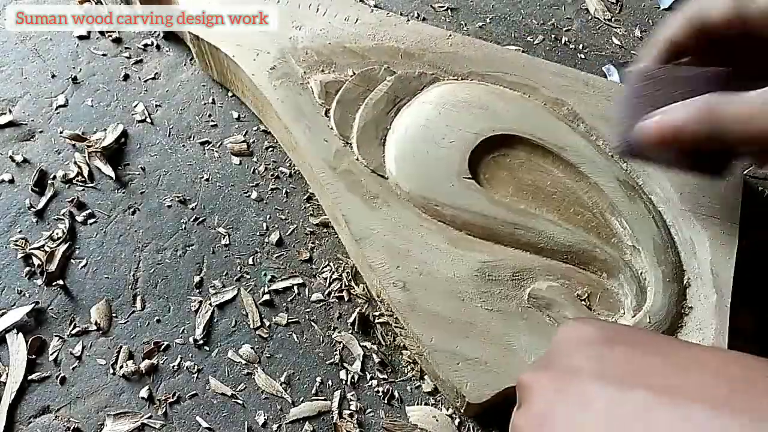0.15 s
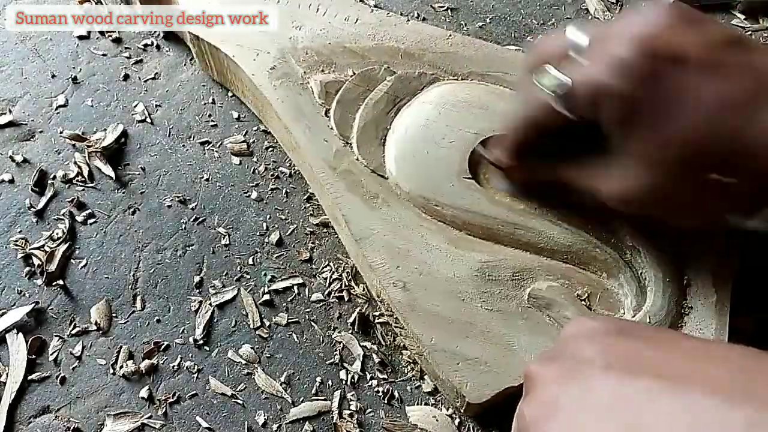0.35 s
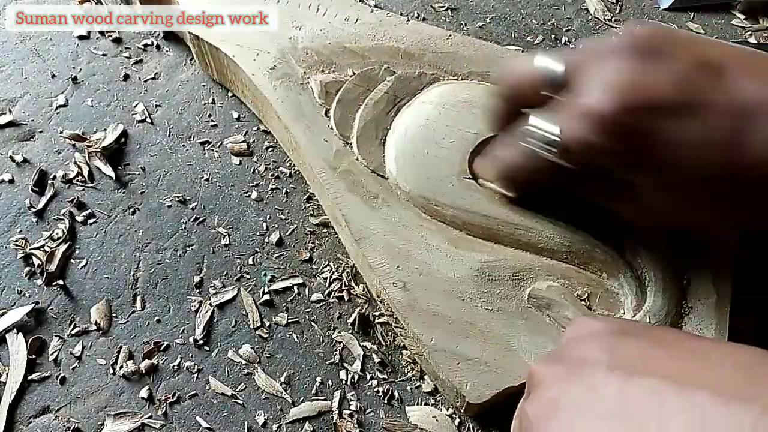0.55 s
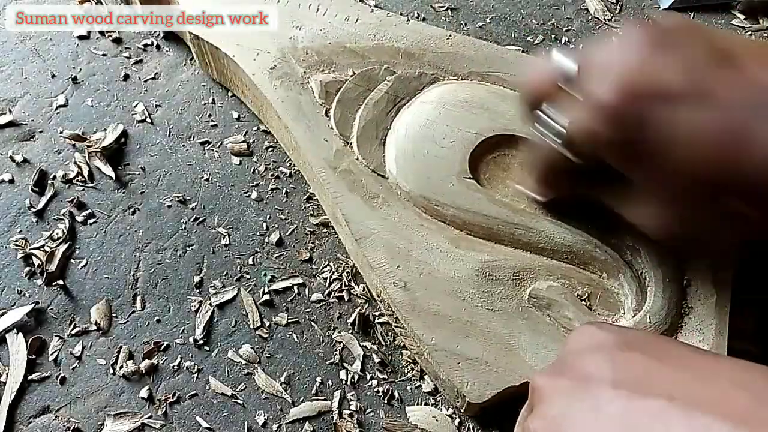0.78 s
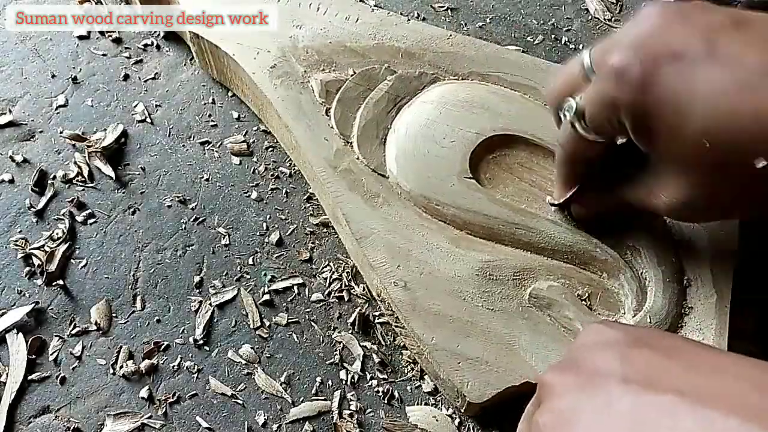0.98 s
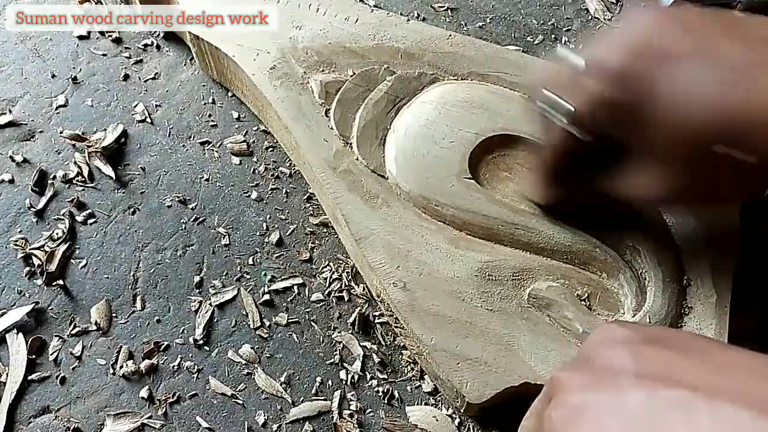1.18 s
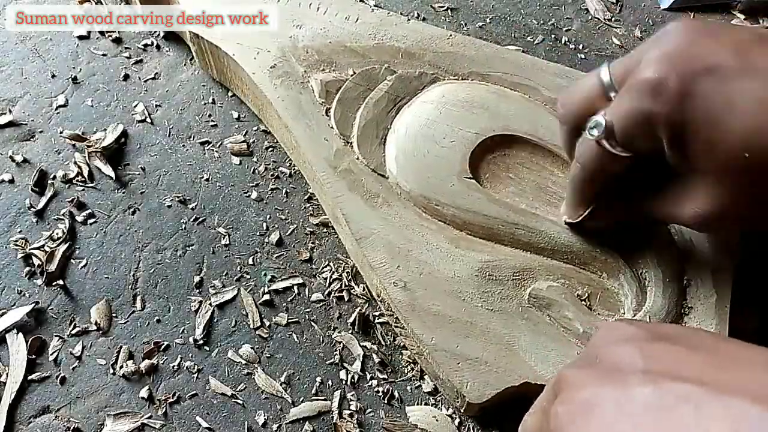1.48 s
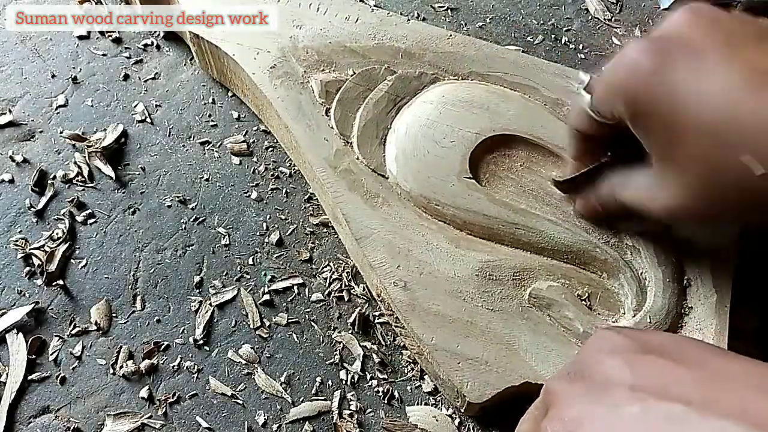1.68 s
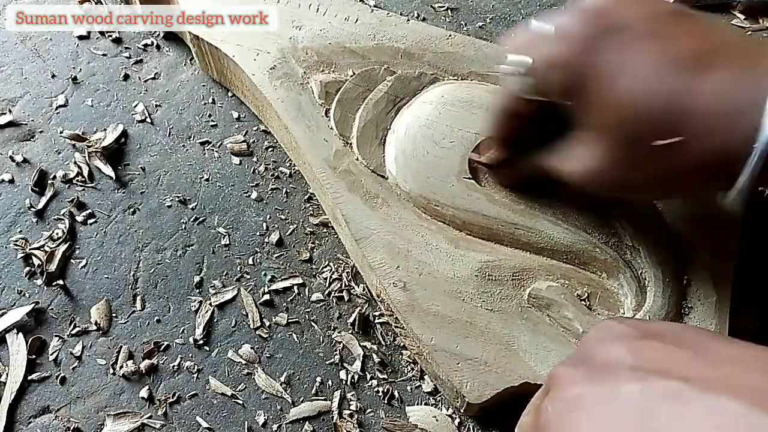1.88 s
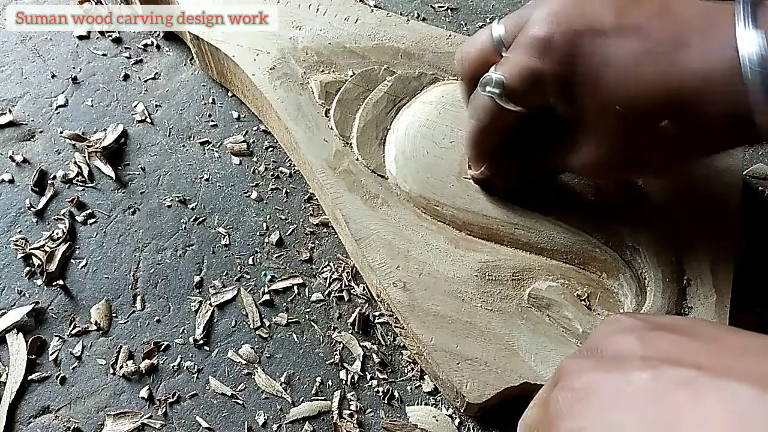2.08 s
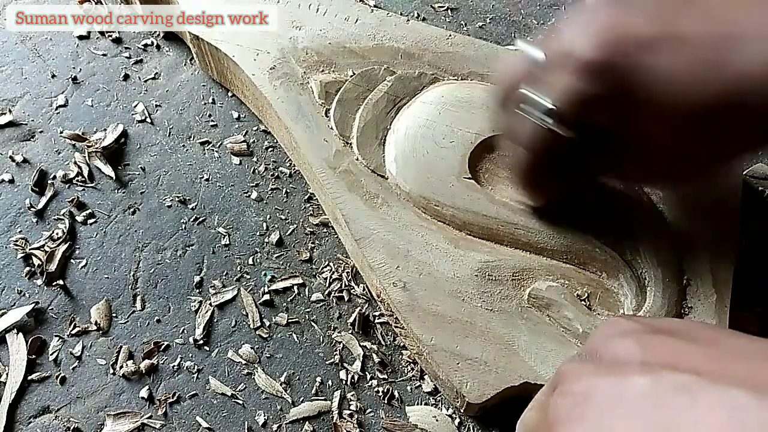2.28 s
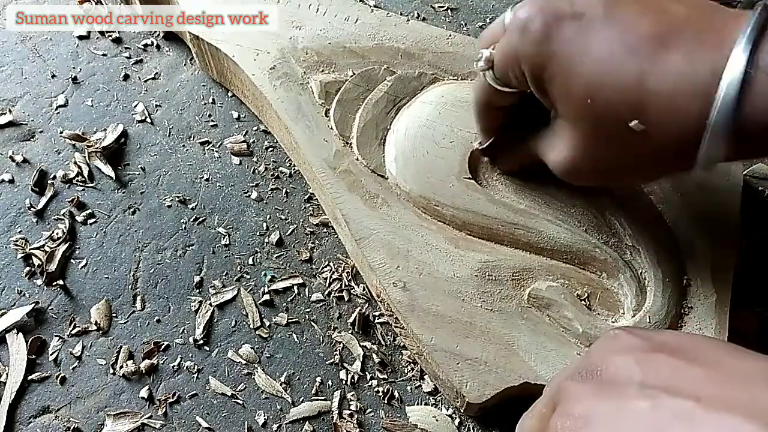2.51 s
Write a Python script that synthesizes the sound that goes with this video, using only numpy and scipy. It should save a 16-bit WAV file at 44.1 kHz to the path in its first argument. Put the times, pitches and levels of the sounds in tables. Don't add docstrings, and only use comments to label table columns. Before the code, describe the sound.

Sandpaper rasps on a carved wooden board: faint touches first, then rapid even to-and-fro strokes with paper snaps and light knocks, a short skid, and last strokes. Close stereo in a softly rumbling workshop.

```python
import sys
import numpy as np
from scipy import signal
from scipy.fft import rfft, irfft
from scipy.io import wavfile
from scipy.ndimage import uniform_filter1d

SR = 44100
rng = np.random.default_rng(int(sys.argv[2]) if len(sys.argv) > 2 else 0)


def natural_amplitude(level_db):
    exponent = np.asarray(level_db, float) / 20
    return 10 ** exponent


def master_out(mix):
    frames = np.transpose(np.atleast_2d(mix))
    ceiling = np.clip(frames, -1, 1)
    pcm = np.round(ceiling * 32767).astype(np.int16)
    wavfile.write(sys.argv[1], SR, pcm)


N = 116865


def rms_one(x):
    return x / np.sqrt(np.mean(x ** 2) + 1e-20)


def at_hz(points, hz):
    table_hz, value = np.transpose(points)
    return np.interp(np.log(hz + 1), np.log(table_hz), value)


def drift(rate_hz):
    r = np.exp(-40 * np.pi * rate_hz / SR)
    noise = rng.standard_normal(N // 20 + 2002)
    slow = signal.lfilter([1], [1, -2 * r, r * r], noise)[2000:]
    return np.interp(np.arange(N) / 20, np.arange(len(slow)), rms_one(slow))


def spread(three, alike, colour_db, lag_s, peaks=()):
    hz = np.fft.rfftfreq(three.shape[1], 1 / SR)
    like = np.clip(at_hz(alike, hz), 0, 1)
    both, left, right = rfft(three)
    left = np.sqrt(like) * both + np.sqrt(1 - like) * left
    right = np.sqrt(like) * both + np.sqrt(1 - like) * right
    left = left * np.exp(-2j * np.pi * hz * lag_s)
    ring_db = sum(db / (1 + (2 * (hz - top_hz) / width) ** 2) for top_hz, width, db in peaks)
    return np.array([left, right]) * natural_amplitude([at_hz(colour, hz) + ring_db for colour in colour_db])


def by_band(spectra, gain_db):
    hz = np.fft.rfftfreq(N, 1 / SR)
    place = np.clip(6 * np.log2((hz + 1) / 600), 0, 27)
    out = 0
    for k in range(28):
        band = irfft(spectra * np.clip(1 - abs(place - k), 0, 1), N)
        out = out + band * natural_amplitude(gain_db(600 * 2 ** (k / 6)))
    return out


# (frequency [Hz], level [dB per Hz])
AIR_COLOUR = [(18, -6), (33, 1), (75, -7), (160, -3), (330, -16), (1500, -23), (2900, -34), (9000, -36)]
# (frequency [Hz], likeness [0-1])
AIR_ALIKE = [(30, 0.94), (150, 0.96), (400, 0.9), (1000, 0.79)]


def air():
    level_db, wander_db = -57.5, 1.63
    sound = irfft(spread(rng.standard_normal((3, N)), AIR_ALIKE, (AIR_COLOUR, AIR_COLOUR), 0), N)
    return natural_amplitude(level_db + wander_db * drift(2.1)) * rms_one(sound)


def grit(speed):
    clicks_per_s, size_spread_db, hiss_share = 7900, 3.5, 0.83
    chance = np.clip(clicks_per_s * (0.34 + speed) / SR, 1e-3, 1)
    size_db = size_spread_db * np.minimum(rng.exponential(1, (3, N)), 3.5)
    sizes = rms_one(natural_amplitude(size_db)) * rng.choice([-1, 1], (3, N))
    clicks = sizes * (rng.random((3, N)) < chance) / np.sqrt(chance)
    hiss = rng.standard_normal((3, N))
    return np.sqrt(1 - hiss_share) * clicks + np.sqrt(hiss_share) * hiss


# (start [s], length [s], level [dB], share of the stroke before top speed [0-1], wood against paper [dB])
TOUCHES = [
    (.002, 0.045, -54.5, 0.084, 1),
    (.025, 0.09, -53.5, 0.094, 2.5),
    (.07, 0.41, -60.5, 0.1, 3.5),
    (.196, 0.02, -51, 0.53, 10.5),
    (.16, 0.029, -71, .5, -8),
    (.272, 0.026, -42.5, 0.17, -2.5),
    (.344, 0.028, -41, .2, -3),
    (2.345, 0.096, -48, 0.047, -1.5),
]
# (start [s], length [s], level [dB], share of the stroke before top speed [0-1], wood against paper [dB])
PUSHES = [(0.238, 0.03, -40, 0.84, 0), (0.356, 0.032, -36, 0.79, -9), (0.464, 0.07, -40.5, 0.32, -3.5),
          (0.585, 0.064, -39, 0.37, -5.5), (0.709, 0.048, -40, 0.27, -4.5), (0.824, 0.059, -41.5, 0.58, -3),
          (0.945, 0.07, -38, 0.15, -10), (1.060, 0.055, -39, 0.27, -7), (1.17, 0.066, -41, 0.51, -5.5),
          (1.29, 0.061, -38.5, 0.41, -7.5), (1.41, 0.056, -40, 0.4, -6.5), (1.532, 0.056, -38.5, 0.5, -8.5),
          (1.661, 0.038, -38.5, 0.52, -3.5), (1.776, 0.032, -38.5, 0.72, -7.5),
          (1.882, 0.041, -39.5, 0.67, -5.5), (1.988, 0.064, -41.5, 0.25, -1),
          (2.107, 0.064, -43, 0.33, -6.5), (2.221, 0.083, -40, 0.1, -5), (2.483, 0.046, -40, 0.73, 0),
          (2.593, 0.052, -42, 0.68, -1)]
# (start [s], length [s], level [dB], share of the stroke before top speed [0-1], wood against paper [dB])
PULLS = [(0.292, 0.058, -38, 0.46, -2), (0.4, 0.061, -38.5, 0.58, -2.5), (0.524, 0.056, -40, 0.6, -2.5),
         (0.644, 0.056, -41.5, 0.6, 1.5), (0.76, 0.062, -39.5, 0.33, 0), (0.879, 0.052, -38.5, 0.65, -3),
         (0.998, 0.057, -38.5, 0.28, -2.5), (1.106, 0.057, -39, 0.68, -2), (1.23, 0.069, -39, 0.36, -3.5),
         (1.35, 0.062, -40, 0.42, -1.5), (1.471, 0.07, -39, 0.33, -2), (1.596, 0.05, -37, 0.7, -2),
         (1.703, 0.061, -40.5, 0.47, -3), (1.82, 0.063, -40.5, 0.41, -0.5), (1.935, 0.063, -42, 0.35, 0),
         (2.044, 0.063, -43.5, 0.47, 0.5), (2.156, 0.065, -40.5, 0.54, -2),
         (2.403, 0.077, -47.5, 0.67, -0.5), (2.54, 0.045, -42, 0.59, -2)]


def strokes():
    speed_power, creep_db, overlap_s, rub_db = 1.536, -27, 0.0028, -6.5
    t = np.arange(N) / SR
    speed, power, wood = np.zeros(N), np.zeros(N), np.full(N, 1e-12)
    for rows, creep in (([*PUSHES, *PULLS], natural_amplitude(creep_db)), (TOUCHES, 0)):
        for start, length, db, rise, wood_db in rows:
            u = (t - start + overlap_s) / (length + 2 * overlap_s)
            rise = np.clip(rise, .1, .9)
            bend = np.clip(np.where(u < rise, u / rise, (1 - u) / (1 - rise)), 0, 1)
            shape = np.sin(np.pi / 2 * bend) ** speed_power
            part = (natural_amplitude(db + rub_db) * (shape + creep * (abs(u - .5) < .5))) ** 2
            speed = np.maximum(speed, shape)
            power = power + part
            wood = wood + part * wood_db
    return speed, np.sqrt(power), wood / (power + 1e-12)


# (frequency [Hz], level [dB per Hz])
RASP_LEFT = [(500, -29), (850, -12), (1350, -17.5), (1900, -3.5), (2900, -1), (7300, -3.5), (8900, 1),
             (14500, -8.5)]
# (frequency [Hz], level [dB per Hz])
RASP_RIGHT = [(850, -14), (1350, -16), (1900, -3), (2900, -1), (6500, -1), (7800, 5), (9200, 1),
              (13000, -7.5)]
# (frequency [Hz], likeness [0-1])
RASP_ALIKE = [(500, .8), (1500, .45), (2450, .3), (2750, .86), (3100, .55), (4700, .45), (6600, .35),
              (11000, .12)]
# (frequency [Hz], width [Hz], level [dB])
RINGS = [(770, 340, 9.5), (1863, 160, 4.5), (3204, 17, 6), (4230, 27, 2), (4700, 33, -6.5),
         (5200, 20, -1.5), (5460, 17, -4.5), (6270, 26, -1), (8440, 1100, 5)]
LEFT_LAG_S = .0002


def rubbing():
    patchy_db, shared_patchy_db, patch_rate_hz = 4.5, 1, 21.4
    patchy_below_hz, wood_below_hz = 7000, 3530
    speed, loud, wood_db = strokes()
    colours = (RASP_LEFT, RASP_RIGHT)
    plain = irfft(spread(rng.standard_normal((3, N)), RASP_ALIKE, colours, LEFT_LAG_S), N)
    unit = np.std(plain.mean(axis=0))
    together = shared_patchy_db * drift(2 * patch_rate_hz)

    def band_db(hz):
        patches = patchy_db * drift(patch_rate_hz) / (1 + (hz / patchy_below_hz) ** 2)
        return together + patches + wood_db / (1 + (hz / wood_below_hz) ** 6)

    rasp = spread(loud * grit(speed), RASP_ALIKE, colours, LEFT_LAG_S, RINGS)
    return by_band(rasp, band_db) / unit


def room(x):
    level_db, t60_s = -11.5, 0.1
    t = np.arange(SR // 2) / SR
    tail = rng.standard_normal((2, len(t))) * natural_amplitude(-60 * t / t60_s) * (t > .004)
    tail = tail / np.sqrt(np.sum(tail ** 2) / 2)
    return natural_amplitude(level_db) * signal.fftconvolve(x, tail, axes=1)[:, :N]


# (time [s], peak level [dB], amount of dull knock)
SNAPS = [(.0105, -46, .1), (.1936, -36, 1.5), (.1950, -40, 2), (.2262, -41, 0), (.2478, -40, .3),
         (.2602, -33, .3), (.3462, -35, .1), (.3732, -28, .2), (.4168, -40, .2), (.6035, -39, .2),
         (.7198, -39, .2), (.7722, -38, .3), (.8912, -36, .2), (.9492, -32, .3), (.9508, -32, .3),
         (.9853, -35, .1), (1.0076, -24, .1), (1.0088, -31, .1), (1.0694, -37, .2), (1.1832, -40, .2),
         (1.2462, -35, .1), (1.2533, -26, .2), (1.2552, -31, .1), (1.2650, -33, .1), (1.3025, -35, .1),
         (1.3632, -36, .3), (1.3762, -30, .1), (1.4910, -32, .3), (1.4216, -37, .1), (1.4802, -34, .3),
         (1.6062, -37, .2), (1.6285, -30, .4), (1.6738, -37, .2), (1.7180, -37, .4), (1.7868, -37, .1),
         (1.7955, -33, .1), (1.8025, -35, .1), (1.8367, -37, .4), (1.9496, -37, .3), (1.9565, -36, .5),
         (2.0676, -39, .3), (2.1185, -40, .2), (2.1704, -36, .3), (2.1830, -34, .3), (2.5070, -35, .2),
         (2.5535, -39, .2), (2.6050, -40, .3)]


def snaps():
    level_db, burst_s, lead = 1, .00032, 256
    out = np.zeros((2, N + SR))
    t = np.clip(np.arange(-lead, 768) / SR, 0, 1)
    noise = rng.standard_normal((len(SNAPS), 3, 1024))
    bursts = noise * np.sqrt(t / burst_s) * np.exp(-t / burst_s)
    for (s, db, knock), burst in zip(SNAPS, bursts):
        burst = (1 + knock) * burst - np.roll(burst, 2, axis=1)
        pair = irfft(spread(burst, RASP_ALIKE, (RASP_LEFT, RASP_RIGHT), LEFT_LAG_S, RINGS))
        first = int(s * SR) - lead
        out[:, first:first + 1024] += natural_amplitude(db + level_db) * pair / abs(pair.mean(axis=0)).max()
    return out[:, :N]


# (frequency [Hz], level [dB], time to fade by 60 dB [s])
BOARD = [(875, -6.5, 0.033), (1547, -14, 0.023), (1882, -4.5, 0.046), (2610, -4, 0.017)]
# (time [s], board tone [0-3], level [dB])
DRAGS = [
    (.021, 0, -56),
    (.028, 0, -55),
    (.034, 2, -57),
    (.040, 2, -57),
    (.052, 2, -59),
    (.062, 2, -62),
]


def board():
    knock_db = -16.5
    strengths_db = rng.normal(0, 4.4, (len(SNAPS), len(BOARD)))
    s, db, knock = np.transpose(SNAPS)
    out = 0
    for k, (hz, mode_db, t60_s) in enumerate(BOARD):
        clicks = np.zeros(N)
        clicks[(s * SR).astype(int) + 20] = knock * natural_amplitude(db + knock_db + mode_db + strengths_db[:, k])
        for at, mode, drag_db in DRAGS:
            clicks[int(at * SR)] += natural_amplitude(drag_db) * (mode == k)
        r, w = natural_amplitude(-60 / (t60_s * SR)), 2 * np.pi * hz / SR
        out = out + signal.lfilter([0, np.sin(w)], [1, -2 * r * np.cos(w), r * r], clicks + 1e-18)
    return out


# (start [s], length [s], first pitch [Hz], last pitch [Hz], breadth [Hz], level [dB])
CHIRPS = [
    (.050, .062, 4150, 5100, 110, -70),
    (2.164, .062, 5800, 5050, 480, -48.5),
]


def birds():
    level_db = 5
    out, t = np.zeros((2, N)), np.arange(N) / SR
    for start, length, first_hz, last_hz, breadth_hz, db in CHIRPS:
        u = np.clip((t - start) / length, 0, 1)
        turn = 2 * np.pi * np.cumsum(first_hz + (last_hz - first_hz) * u) / SR
        swell = natural_amplitude(db + level_db) * np.sqrt(abs(np.sin(np.pi * u)))
        for side in out:
            side += swell * (drift(breadth_hz) * np.cos(turn) + drift(breadth_hz) * np.sin(turn))
    return out * natural_amplitude([[-2], [2]])


# (time [s], level [dB])
SKID = [
    (2.262, -56),
    (2.29, -47),
    (2.301, -41),
    (2.313, -40),
    (2.319, -46),
    (2.328, -38),
    (2.336, -46),
    (2.345, -54),
    (2.36, -60),
]
# (frequency [Hz], width [Hz], level [dB])
HOLLOW = [(1144, 54, 2.5), (1460, 170, -2), (2380, 170, -0.5), (3036, 160, 3.5), (4780, 740, 4),
          (6000, 530, 3.5), (7840, 1250, 1)]


def skid():
    level_db, rough_db = 2.5, 1
    s, db = np.transpose(SKID)
    path_db = np.interp(np.arange(N) / SR, s, db, left=-99, right=-99)
    loud = natural_amplitude(path_db + level_db + rough_db * drift(79))
    rough, out = grit(np.full(N, .3))[1:], 0
    for k, (hz, width, top_db) in enumerate(HOLLOW):
        r = np.exp(-np.pi * width / SR)
        poles = [1, -2 * r * np.cos(2 * np.pi * hz / SR), r * r]
        out = out + (-1) ** k * natural_amplitude(top_db) * signal.lfilter([1 - r * r, 0, r * r - 1], poles, rough)
    return uniform_filter1d(loud, size=90) * rms_one(out) * natural_amplitude([[1], [2]])


def scene():
    work = rubbing() + snaps() + skid() + board()
    return work + room(work) + birds() + air()


# (from [s], to [s], from [Hz], to [Hz])
THINNED = [(.34, .40, 2650, 3100), (.45, .51, 2700, 3150), (.57, .63, 2600, 3050), (.69, .77, 2700, 3350),
           (.92, .97, 2650, 3100), (1.04, 1.21, 2650, 2900), (1.29, 1.32, 2650, 3000),
           (1.43, 1.46, 3050, 3400), (1.50, 1.55, 3200, 3400), (1.64, 1.69, 2600, 3050),
           (1.72, 1.78, 2400, 3150), (1.78, 1.83, 2450, 2950), (1.95, 2.0, 2650, 3000),
           (2.17, 2.21, 2750, 3150), (2.21, 2.25, 3150, 3350), (2.40, 2.47, 2700, 3150),
           (2.41, 2.44, 3900, 4100), (2.49, 2.53, 2600, 2950), (2.53, 2.58, 2600, 3300)]


def thin_sum(x):
    drop_db, thinned_db = -6.2, 9
    hz, t, (mid, side) = signal.stft([x[0] + x[1], x[0] - x[1]], SR, nperseg=2048)
    power = uniform_filter1d(abs(np.array([mid, side])) ** 2, size=8, axis=1)
    power = uniform_filter1d(power, size=2, axis=2)[:, 4::8]
    band_hz = hz[4::8, None]
    thinned = sum((t > a) & (t < b) & (band_hz > low) & (band_hz < high) for a, b, low, high in THINNED)
    keep = np.repeat(power[0] > power[1] * natural_amplitude(2 * (drop_db + thinned_db * thinned)), 8, axis=0)
    side_power = power[1].sum(axis=0)
    quiet = side_power < .12 * np.median(side_power)
    mid[1:] *= keep | (hz[1:, None] < 2100) | quiet
    mid, side = signal.istft(np.array([mid, side]), SR, nperseg=2048)[1][:, :N]
    return np.array([mid + side, mid - side]) / 2


def top_cut(x):
    return signal.sosfilt(signal.butter(12, 15560, fs=SR, output="sos"), x)


def record(dry):
    low_pass = signal.cheby2(14, 39, 14600, fs=SR, output="sos")
    mix = thin_sum(signal.sosfilt(low_pass, dry))
    return top_cut(mix)


dry = scene()
out = record(dry)
master_out(out)
```